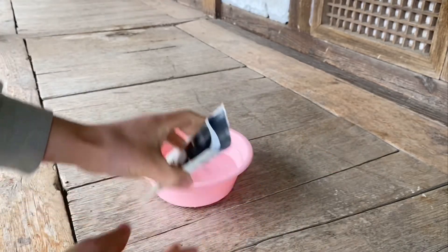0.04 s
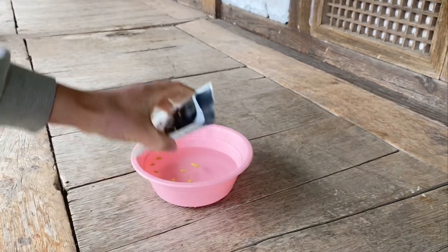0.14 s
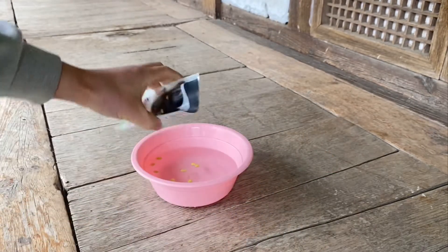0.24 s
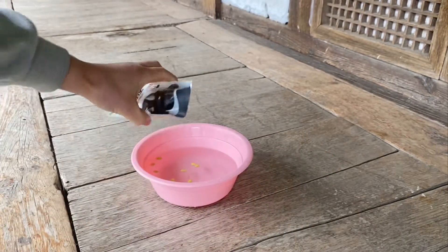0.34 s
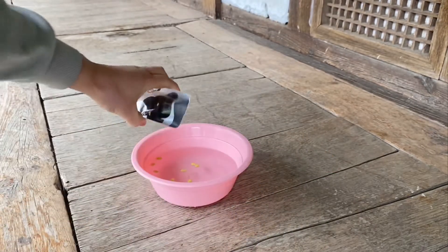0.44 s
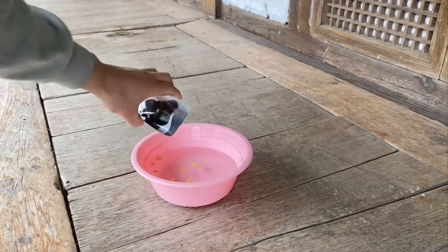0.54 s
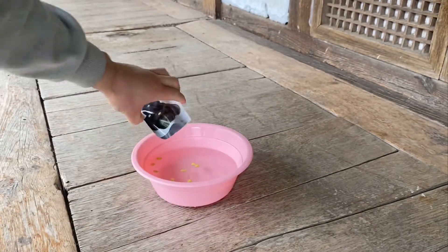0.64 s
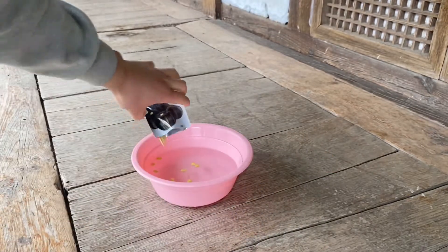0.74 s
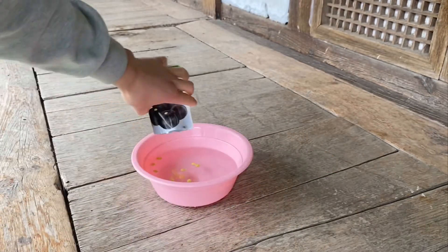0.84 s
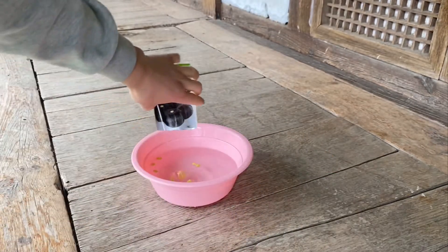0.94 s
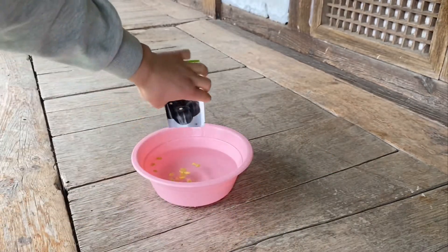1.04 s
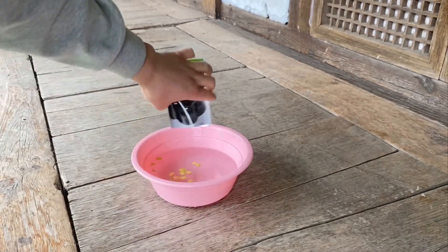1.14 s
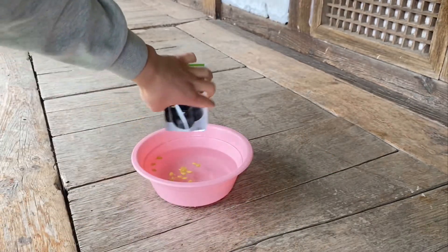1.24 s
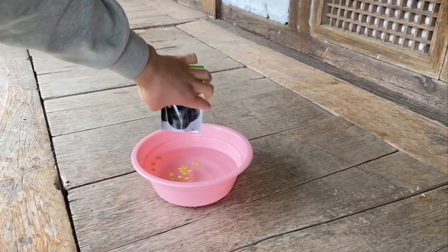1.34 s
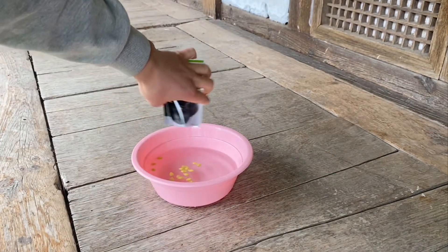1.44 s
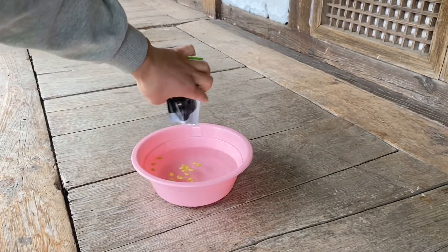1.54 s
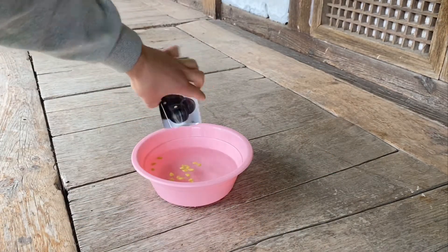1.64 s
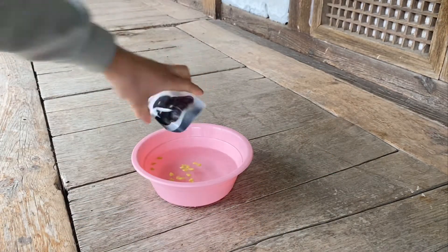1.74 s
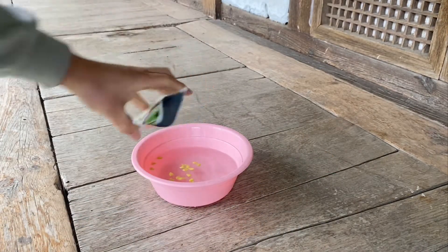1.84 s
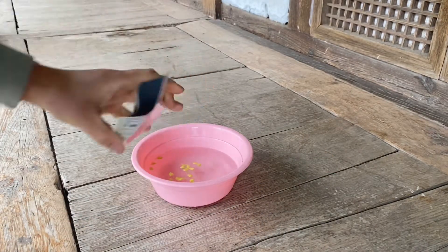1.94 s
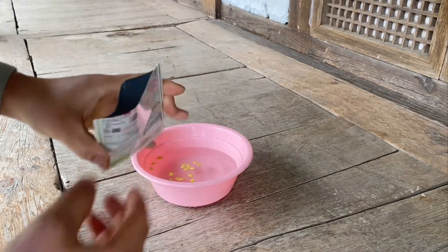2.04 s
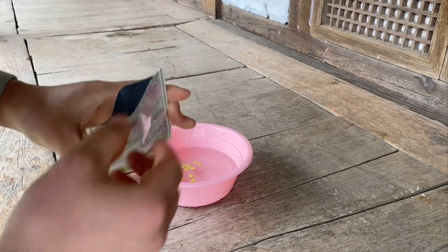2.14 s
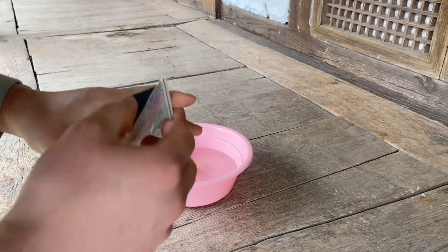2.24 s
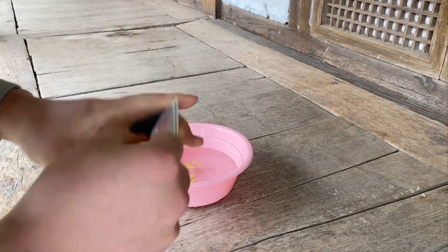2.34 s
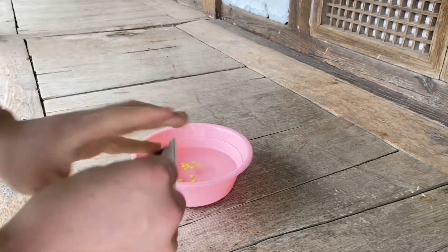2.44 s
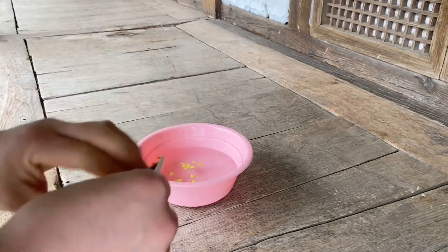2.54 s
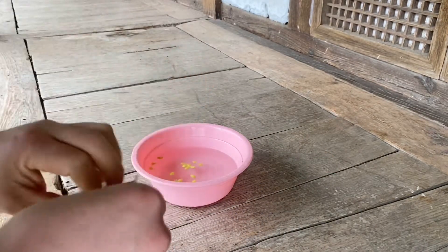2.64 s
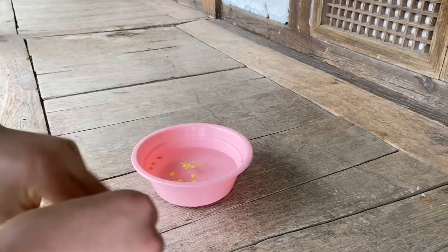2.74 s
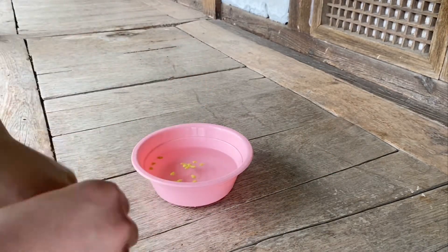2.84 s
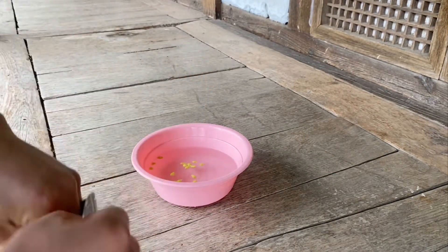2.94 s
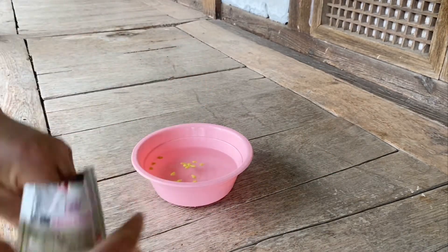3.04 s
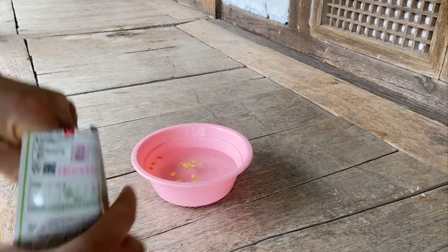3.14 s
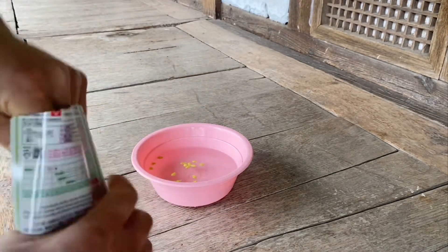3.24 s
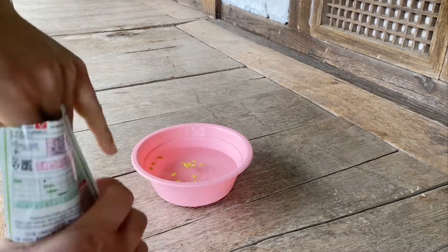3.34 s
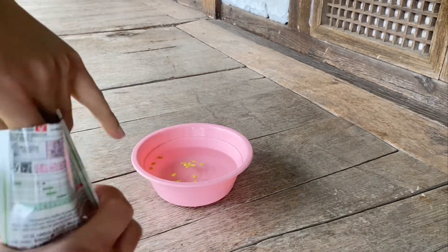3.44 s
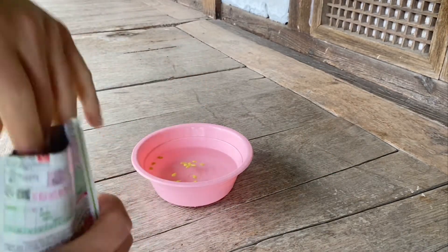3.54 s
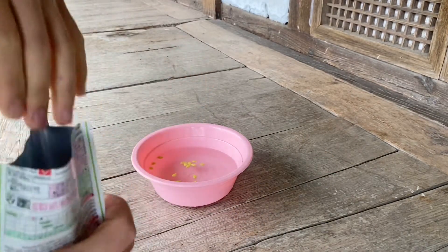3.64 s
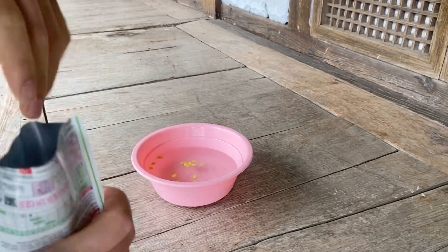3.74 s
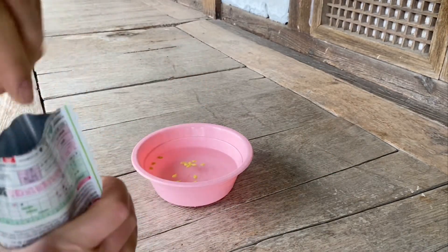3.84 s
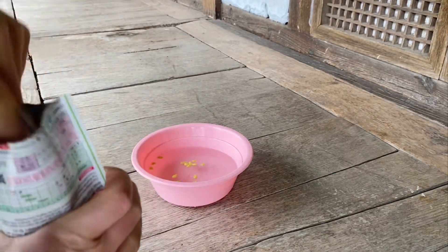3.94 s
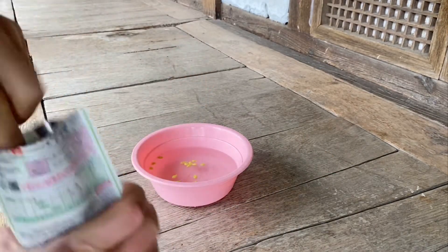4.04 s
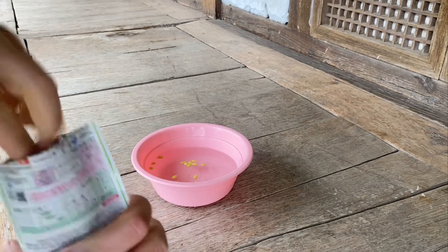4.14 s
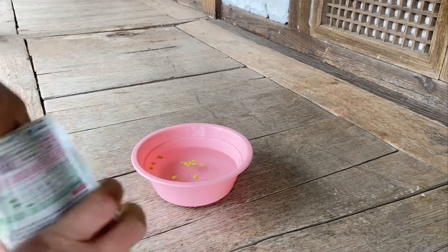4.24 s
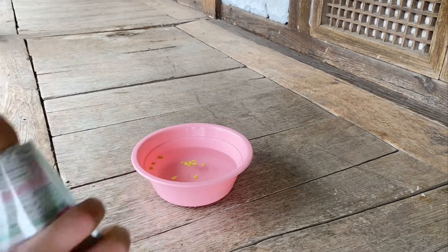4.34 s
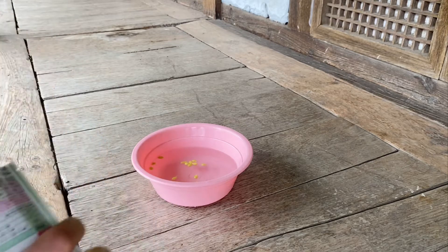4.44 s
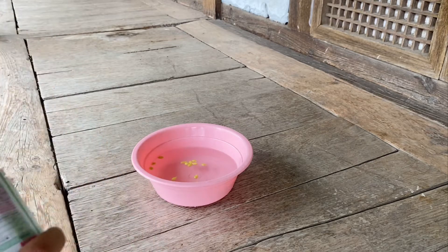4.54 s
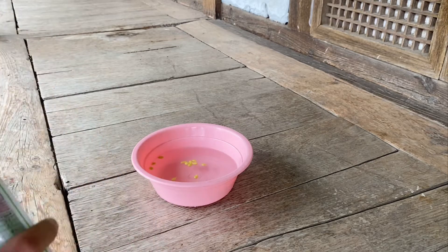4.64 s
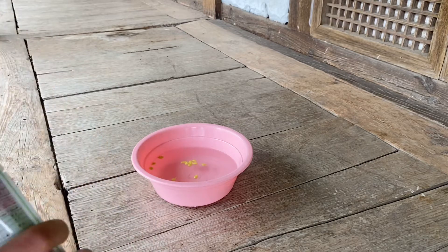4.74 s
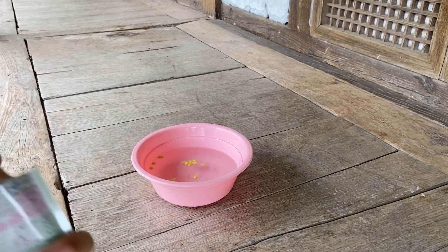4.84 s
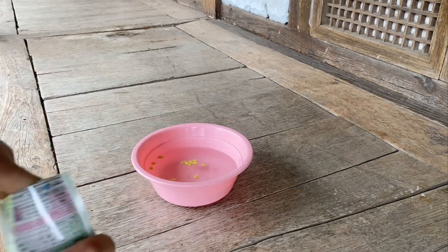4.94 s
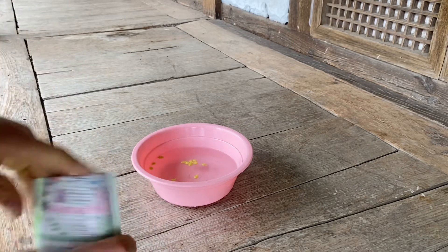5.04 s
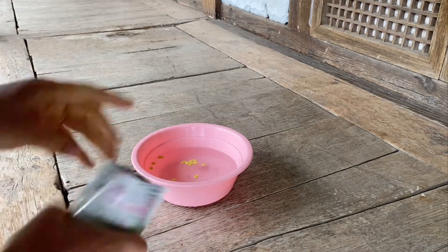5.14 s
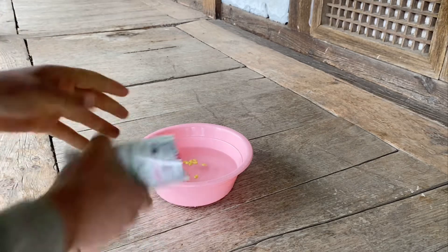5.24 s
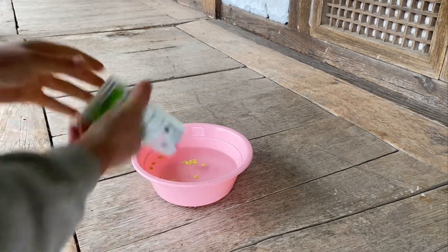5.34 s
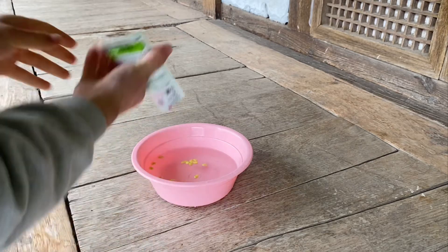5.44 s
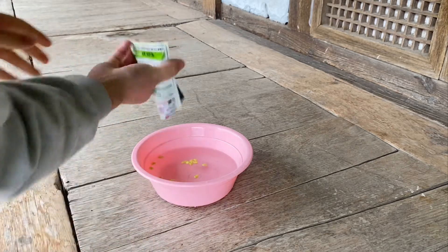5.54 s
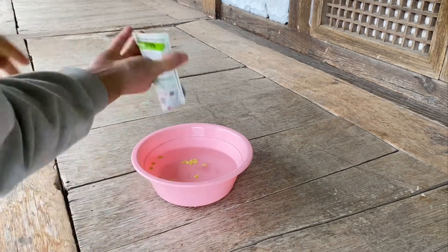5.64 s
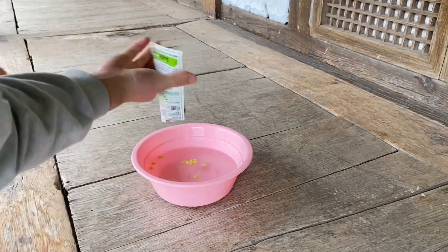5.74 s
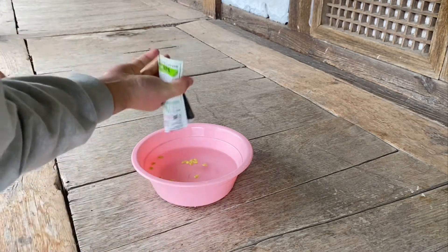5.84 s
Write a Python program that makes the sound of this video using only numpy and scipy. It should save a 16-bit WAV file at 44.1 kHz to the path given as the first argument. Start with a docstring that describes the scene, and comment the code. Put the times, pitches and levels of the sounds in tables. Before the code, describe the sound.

First very quiet: a small crumple, a whispery rush of seeds, a couple of ticks and a distant engine hum with faint bird chirps. After about two seconds a paper pouch crackles loudly nearby, left of centre, with one hard snap, uneven bursts of crumpling, finger rubbing and dull bumps, then fades to slight rustles. Outdoor porch, close stereo pickup.

```python
"""Still air on a quiet wooden porch, a faint crumple, then seeds sliding out of a stiff coated-paper packet
into a plastic basin: hissing slips sound the packet's air column. The hands then bring the packet close,
left of a two-port microphone, and pry it open: creases snap, walls crumple, knock and rub, and the air
in the pouch rings. Far off an engine hums and a bird chirps. Levels are at the source, before the packet's
placing, the porch echo and the microphone."""
import sys
import numpy as np
from scipy import signal
from scipy.fft import rfft, irfft
from scipy.io import wavfile
from scipy.ndimage import map_coordinates

SR = 44100
rng = np.random.default_rng(int(sys.argv[2]) if len(sys.argv) > 2 else 0)


def store_pcm(level_fs):
    """Save levels as 16-bit WAV."""
    pcm = np.round(np.clip(level_fs, -1, 1) * 32767).astype(np.int16)
    wavfile.write(sys.argv[1], SR, np.atleast_2d(pcm).T)


N = 259308
T = np.arange(N) / SR
LEAD = 0.005  # time for a crease to take up strain before it flips (s)


def amp(db):
    """Decibels to gain."""
    return 10 ** (np.asarray(db) / 20)


def unit(x):
    """Scales to an rms of one."""
    return x / np.sqrt(np.mean(abs(x) ** 2) + 1e-20)


def read(points, hz):
    """Reads a spectrum on a log-frequency axis."""
    f, value = np.transpose(points)
    return np.interp(np.log(hz + 1), np.log(f), value)


def level(curve):
    """A dB curve as a gain for every sample, silent outside its span."""
    return amp(np.interp(T, *np.transpose(curve), left=-np.inf, right=-np.inf))


def add(mix, s, sound):
    """Lays a sound into the mix from time s, cut off at both ends of the mix."""
    start = round(s * SR)
    sound = sound[..., max(-start, 0):]
    part = mix[..., max(start, 0):][..., :sound.shape[-1]]
    part += sound[..., :part.shape[-1]]


def bins(size=4096):
    """Frequencies of a filter's gain curve, in Hz, raised by 1 Hz to avoid zero."""
    return np.fft.rfftfreq(size, 1 / SR) + 1


def colour(x, gain):
    """Causal, minimum-phase filter with the given gain over bins(): it rings only after the blow."""
    both_sides = np.r_[gain, gain[-2:0:-1]]
    log_gain = np.log(np.maximum(both_sides, 1e-5))
    response = np.exp(np.conj(signal.hilbert(log_gain)))
    taps = np.fft.ifft(response).real
    return signal.fftconvolve(x, taps[None, :len(taps) // 2], axes=1)[:, :N]


def bell(hz, q):
    """Gain of a damped resonance."""
    return 1 / (1 + q ** 2 * (bins() / hz - hz / bins()) ** 2)


def pair(two, same):
    """Two unrelated signals become two ports that hear partly the same."""
    same = np.clip(same, 0, 1)
    return np.array([two[0], same * two[0] + np.sqrt(1 - same ** 2) * two[1]])


def wander(step):
    """A random line of unit spread that takes a new turn every step seconds."""
    return np.interp(T / step, np.arange(2000), rng.standard_normal(2000))


def shifting(sounds, step, shift_db):
    """Passes from one facet's sound to another at random, keeping the total power."""
    length = sounds[0].shape[1]
    share = amp(shift_db * np.array([wander(step)[:length] for _ in sounds]))
    share /= np.linalg.norm(share, axis=0)
    return sum(sound * weight for sound, weight in zip(sounds, share))


def gestures(rows, attack, release, crest, arch_db):
    """Gain of a series of movements: each sets in, swells to a crest, eases and dies 20 dB per release."""
    power = np.zeros(N)
    for start, length, db in rows:
        t = np.arange(0, length + 4 * release, 1 / SR)
        onset = np.minimum(t / attack, 1)
        arch = -arch_db * (np.minimum(t / length, 1) / crest - 1) ** 2
        decay = -20 * np.maximum(t - length, 0) / release
        add(power, start, (onset * amp(db + arch + decay)) ** 2)
    return np.sqrt(power)


def grains(count, per_s, spread_db, hiss):
    """Tiny slips of uneven size at random moments over a smooth hiss."""
    size = amp(spread_db * np.minimum(rng.exponential(1, count), 3.5))
    slips = size * (rng.random(count) < per_s / SR)
    strength = np.hypot(unit(slips), hiss)
    return unit(pair(rng.standard_normal((2, count)) * strength, same=0.45))


# Crackle of the packet wall. Each row: frequency in Hz, gain in dB before the tilt for brightness.
WALL_CRACKLE = [(30, -45.5), (120, -19), (500, -13), (1500, -1.5), (3000, 0), (4500, 2), (6500, -3),
                (10000, -8), (15000, -13.5)]


def packet(bright_db, ring_hz, ring_db, push_db, ring_q=2.41, overtone=1.675, overtone_db=-6,
           push_hz=320, push_q=0.41, ripple_db=2.5):
    """The wall's crackle, two air modes in the pouch and the push of the whole panel."""
    octaves = np.log2(np.maximum(bins(), 1000) / 4000)
    wall = amp(read(WALL_CRACKLE, bins()) + bright_db * octaves)
    modes = np.hypot(bell(ring_hz, ring_q), amp(overtone_db) * bell(ring_hz * overtone, ring_q))
    ring = amp(ring_db) * modes
    push = amp(push_db) * bell(push_hz, push_q)
    gain = np.sqrt(wall ** 2 + ring ** 2 + push ** 2)
    # each new shape of the wall has its own resonances
    facets = np.geomspace(200, 16000, 64)
    ripple = np.interp(bins(), facets, rng.uniform(-2, 1.5, len(facets)))
    return unit(gain * amp(ripple_db * ripple))


def panel(bright_db, ring_hz, hollow_db, push_db, push_share=0.9494):
    """Tone of a buckle: the hollower the panel, the more it rings the pouch and pushes the air."""
    return packet(bright_db, ring_hz, hollow_db, push_db + push_share * hollow_db)


def snap(length, jolt=0.098, even=0.18, onset=0.15, strain=0.41):
    """A crease strains, flips over and leaves the panel fluttering; carries one millisecond of unit power."""
    t = T[:1024] - LEAD
    since = t - onset * length
    swell = amp(20 * np.minimum(since / (strain * length), -since / length))
    shiver = pair(rng.standard_normal((2, len(t))), same=0.706) * swell
    shiver /= np.linalg.norm(shiver, axis=1, keepdims=True)
    shiver[:, swell.argmax()] += jolt
    # a broad panel has no deep gaps in its spectrum
    z = rfft(shiver, 2 * len(t))
    flip = irfft(z / abs(z) ** np.clip(even, 0, 1))[:, :len(t)]
    return flip * np.sqrt(2 * SR / 1000 / np.sum(flip ** 2))


# Spectrum of the outdoor quiet. Each row: frequency in Hz, relative level in dB.
OUTDOOR_AIR = [(20, -30.5), (72, 7.5), (110, -7.5), (320, -9.5), (600, -21), (1100, -20), (1240, -16.5),
               (1400, -21), (3000, -30), (15000, -43)]
# Hum of an engine far beyond the porch. Each row: time in seconds, level in dB.
ENGINE_HUM = [(1.1, -81), (1.35, -59.5), (2.8, -66.5), (3.5, -84)]


def outdoors(air_db=-70.0, hum_hz=45, octave_db=-7, waver=0.099, uneven_db=2.0, step=0.036):
    """Still air, its bass alike at both ports, and the uneven, wavering hum of a far engine."""
    hz = np.fft.rfftfreq(N, 1 / SR)
    noise = rfft(rng.standard_normal((2, N)))
    air = irfft(pair(noise, same=1 / (1 + (hz / 700) ** 2)) * amp(read(OUTDOOR_AIR, hz)), N)
    turn = 2 * np.pi * np.cumsum(hum_hz * (1 + waver * wander(step))) / SR
    hum = np.sin(turn) * amp(uneven_db * wander(step))
    hum += np.sin(2 * turn) * amp(octave_db + uneven_db * wander(step))
    return amp(air_db) * unit(air) + level(ENGINE_HUM) * unit(hum)


# Chirps of a bird far from the porch. Each row: start in seconds, top pitch in Hz.
BIRD_CHIRPS = [(1.189, 10030), (1.19, 7900), (1.29, 7160), (1.64, 7470)]


def bird(db=-86, length=0.061, arch=0.23, crest=0.34):
    """Thin, faint chirps whose pitch rises a little and falls away."""
    out = np.zeros((2, N))
    part = np.arange(0, length, 1 / SR) / length
    for s, hz in BIRD_CHIRPS:
        pitch = hz * (1 - arch * (part - crest) ** 2)
        turn = 2 * np.pi * np.cumsum(pitch) / SR
        add(out, s, amp(db) * np.sin(np.pi * part) * np.sin(turn))
    return out


# Soft bumps of the hands. Each row: start in seconds, peak of the envelope in dB.
HAND_BUMPS = [(2.692, -36.5), (2.845, -43), (3.11, -45.5), (4.986, -44), (5.042, -43)]


def bumps(hz=85, width=0.0037):
    """A soft blow gives little more than one slow push and pull of the air."""
    out = np.zeros((2, N))
    t = T[:SR // 10]
    swell = t / width * np.exp(1 - t / width)
    for s, db in HAND_BUMPS:
        add(out, s, amp(db) * swell * np.sin(2 * np.pi * hz * t))
    return out


# Air column of the open packet. Each row: resonance in Hz, width in Hz, relative level in dB.
AIR_COLUMN = [(1524, 129, 7), (1961, 57, 4), (2766, 134, 0)]
# Tips of the packet that set the seeds sliding. Each row: start in seconds, length in seconds, level in dB.
SEED_TIPS = [(.34, 0.3465, -53), (.74, 0.1047, -70), (1.1, 0.0416, -69), (1.405, 0.024, -72),
             (1.55, 0.0206, -66.5)]
# One slide, in order: attack in seconds, release in seconds, share of its length at which it runs fastest,
# dB weaker at its start.
SLIDE = (.006, .055, .72, 14)
# Single seeds ticking. Each row: time in seconds, level in dB over a millisecond.
SEED_TICKS = [(.745, -44), (0.765, -40.5), (1.77, -54), (1.783, -55.5), (2.073, -56)]


def seeds():
    """Seeds skid along the packet, sounding its air column, and a few tick as they drop."""
    modes = [amp(db) ** 2 * bell(hz, hz / width / 2) ** 2 for hz, width, db in AIR_COLUMN]
    column = np.sqrt(sum(modes))
    wall = amp(-11.0) * packet(bright_db=1.0, ring_hz=1393, ring_db=9.5, push_db=0.5)
    skid = colour(grains(N, per_s=1500, spread_db=0.5, hiss=1.0), unit(np.hypot(column, wall)))
    # the resonances climb as the seeds run out, then ease back: a varying reading speed
    emptying = np.interp(T, [0.4, 0.75, 1], [0.96, 1.12, 1])
    at = np.cumsum(emptying)
    skid = np.array([map_coordinates(port, [at], order=3) for port in skid])
    out = gestures(SEED_TIPS, *SLIDE) * skid
    for s, db in SEED_TICKS:
        tone = packet(bright_db=-0.5, ring_hz=2800, ring_db=-2.5, push_db=-8.5)
        add(out, s - LEAD, amp(db) * colour(snap(length=0.013), tone))
    return out


# Finger strokes over the packet. Each row: start in seconds, length in seconds, level of the gesture in dB.
FINGER_STROKES = [(.297, 0.103, -63.5), (2.2, 1, -58.5), (2.6, 0.167, -47.5), (2.88, 0.0305, -45.5),
                  (2.98, 0.61, -55), (3.39, 0.1246, -46.5), (3.53, 0.0801, -52.5), (3.94, 0.0651, -51.5),
                  (4.07, 0.0594, -40.5), (4.16, 0.2351, -53.5), (4.447, 0.0285, -48.5),
                  (4.45, 0.686, -62.5), (4.885, 0.162, -48), (5.1, 0.682, -76), (5.388, 0.033, -58)]
# One stroke, in order: attack in seconds, release in seconds, share of its length at which it presses
# hardest, dB weaker at its start.
STROKE = (0.005, 0.031, 0.498, 4)


def rub(count=5, low_hz=900, high_hz=1900):
    """Fingers drag over one facet of the wall after another, each with its own ring; their pads pat it softly."""
    facets = []
    for ring_hz in np.geomspace(low_hz, high_hz, count):
        tone = packet(bright_db=3.0, ring_hz=ring_hz, ring_db=11.5, push_db=7.0, ripple_db=5.0)
        facets.append(colour(grains(N, per_s=300, spread_db=1.1, hiss=0.7), tone))
    drag = unit(shifting(facets, step=0.025, shift_db=5.0))
    pats = colour(grains(N, per_s=150, spread_db=-0.5, hiss=0.41), unit(bell(hz=332.5, q=4.2)))
    return gestures(FINGER_STROKES, *STROKE) * (amp(-1.5) * drag + amp(-15.5) * pats)


# Whole walls of the packet flexing over with a hollow knock. Each row: start in seconds, peak in dB before
# the stutter, pitch in Hz it settles at before the waver, seconds to its peak.
WALL_FLEXES = [(1.606, -51, 207.1, 0.007), (2.198, -50, 313, 0.0029), (3.151, -38.5, 328, 0.00296),
               (3.599, -55, 331.4, 0.00964), (4.664, -43, 360, 0.00138), (4.684, -37, 994, 0.0019),
               (4.785, -45, 465, 0.001524), (4.799, -38.5, 701.5, 0.00295), (5.022, -40.5, 380.3, 0.00325),
               (5.4266, -31.5, 1104, 0.001081)]


def flexes(slacken=0.35, waver_share=0.11, stutter_share=1):
    """Each knock is a few cycles of one low mode, falling in pitch as the wall slackens."""
    out = np.zeros((2, N))
    for s, db, hz, rise in WALL_FLEXES:
        age = np.arange(0, 10 * rise, 1 / SR) / rise
        lines = rng.standard_normal((2, 20))
        waver, stutter = (np.interp(2 * age, np.arange(20), line) for line in lines)
        pitch = hz * (1 + slacken * np.exp(-age / 2) + waver_share * waver)
        swell = (1 + stutter_share * stutter) * age * np.exp(1 - age)
        add(out, s, amp(db) * swell * np.sin(2 * np.pi * np.cumsum(pitch) / SR))
    return out


# Crumples of the wall. Each row: time of the height in seconds, level in dB, rise in seconds,
# brightness in dB per octave, pouch ring in Hz, hollowness in dB.
WALL_CRUMPLES = [(0.012, -56.5, 0.0035, 5.5, 1812, 19.5), (1.636, -58, 0.0582, 1.5, 1478, 15.5),
                 (2.249, -45.5, 0.02, -8.5, 1530, 7.5), (2.356, -44, 0.03054, 4.5, 1141, 15),
                 (2.663, -33, 0.0065, 2.5, 919, 23.5), (2.676, -31, 0.00967, -1.5, 1030, 15),
                 (2.713, -31.5, 0.005, -4.5, 2904, 9), (2.733, -33.5, 0.0055, 2, 4100, -6),
                 (3.134, -40, 0.00653, -0.5, 647, 20.5), (3.508, -43.5, 0.0086, 3.5, 1806, 13),
                 (3.604, -51, 0.01985, -2.5, 340, 18), (3.836, -35, 0.0071, -1.5, 1022, 14),
                 (3.949, -42, .036, 2, 381, 7.5), (4.125, -23, 0.0171, 1, 1430, 7),
                 (4.952, -26.5, 0.01286, 3.5, 960, 47), (5.02, -33.5, 0.01114, 4.5, 1010, 16.5),
                 (5.045, -40, 0.027, 1.5, 990, 14), (5.443, -47, 0.014, 2, 1409, 10),
                 (5.805, -60, 0.0282, -3, 740, 31.5)]


def crumples(count=4, middling_s=0.032, middling_db=-40, spent=0.3):
    """Swarms of tiny buckles swell and die, passing from facet to facet; rise and fall each span 20 dB."""
    out = np.zeros((2, N))
    for s, db, rise, *tone in WALL_CRUMPLES:
        # a harder squeeze is spent sooner (spent: dB per dB)
        fall = middling_s * amp(-spent * (db - middling_db))
        t = np.arange(-rise, 2 * fall, 1 / SR)
        swell = amp(20 * np.minimum(t / rise, -t / fall))
        swell_rms = np.sqrt(np.mean(swell ** 2))
        facets = []
        for _ in range(count):
            swarm = unit(grains(len(t), per_s=900, spread_db=2.5, hiss=0.16) * swell) * swell_rms
            facets.append(colour(swarm, panel(*tone, push_db=-10.5)))
        add(out, s - rise, amp(db) * shifting(facets, step=0.012, shift_db=7.0))
    return out


# Creases that buckle. Each row: time in seconds, level in dB over a millisecond, length in seconds,
# brightness in dB per octave, pouch ring in Hz, hollowness in dB.
CREASE_SNAPS = [(1.615, -37.5, 0.0069, 7.5, 1572, 26), (1.756, -43, 0.00543, 2.5, 864, 20.5),
                (2.2312, -26.5, 0.0086, -7.5, 2020, 17), (2.443, -30.5, 0.0032, -3.5, 1014, -6),
                (2.521, -18.5, 0.00398, -1.5, 1850, 4), (2.594, -24, 0.00366, -3, 3100, -1),
                (2.8415, -23.5, 0.00532, -5, 1640, 0), (2.9009, -25, 0.00684, 4, 1134, 10),
                (2.9821, -30.5, 0.0064, 1, 2500, 9), (3.099, -30.5, 0.00363, -4, 964, 19),
                (3.1758, -10.5, 0.002047, -0.5, 4365, 2.5), (3.2517, -31, 0.00214, -6.5, 3350, 1.5),
                (3.386, -27.5, 0.00558, -3.5, 1190, 13), (3.851, -29, 0.00753, 5.5, 1632, 16),
                (4.1052, -25, 0.0048, -2.5, 1660, -6), (4.4708, -29, 0.0067, 0, 3530, -9.5),
                (4.5291, -21.5, 0.00212, -4.5, 2010, -1.5), (4.682, -26.5, 0.00377, 4, 1076, 6),
                (4.74, -25, 0.00735, 1, 1595, 15), (4.797, -28, 0.0061, 0.5, 988, 29.5),
                (4.961, -20, 0.00604, -9, 1170, -3.5), (4.9776, -26, 0.0054, 2.5, 837, 9),
                (5.427, -33, 0.0051, -6.5, 1600, 27), (5.5565, -42, 0.00514, -4, 1439, 23.5)]
# Small creases that tick with one common tone. Each row: time in seconds, level in dB over a millisecond.
CREASE_TICKS = [(2.503, -35), (2.806, -36.5), (2.826, -35), (2.865, -30.5), (3.168, -32), (3.456, -36.5),
                (4.115, -30), (4.954, -26.5), (5.672, -57.5), (5.71, -56), (5.773, -58)]


def snaps(push_db=-2):
    """Creases popping in and out, large and small."""
    out = np.zeros((2, N))
    for s, db, length, *tone in CREASE_SNAPS:
        add(out, s - LEAD, amp(db) * colour(snap(length), panel(*tone, push_db)))
    for s, db in CREASE_TICKS:
        tone = panel(bright_db=-4.0, ring_hz=900, hollow_db=11.0, push_db=push_db)
        add(out, s - LEAD, amp(db) * colour(snap(length=0.0065), tone))
    return out


def bend(x, lag=0.00508, knee_hz=400):
    """Slow bending waves in the wall: the bass arrives after the treble, so every click chirps downward."""
    hz = np.fft.rfftfreq(2 * N, 1 / SR)
    delay = lag / (1 + (hz / knee_hz) ** 1.5)
    phase = 2 * np.pi * np.cumsum(delay) * hz[1]
    return irfft(rfft(x, 2 * N) * np.exp(-1j * phase))[:, :N]


# Where the packet is. Each row: time in seconds, lead of the left port in ms, left minus right in dB.
PACKET_PLACE = [(2, 0.143, 1), (3.5, 0.2703, 2), (4.701, 0.3293, 3), (5.502, 0.1223, 0)]


def place(x):
    """The packet is on the left: the right port hears it later and, where the levels differ, weaker."""
    s, lead_ms, side_db = np.transpose(PACKET_PLACE)
    late = np.arange(N) - np.interp(T, s, lead_ms) * SR / 1000
    side = amp(np.interp(T, s, side_db))
    right = map_coordinates(x[1], [late], order=3)
    return np.array([side * x[0], right]) * np.sqrt(2 / (1 + side ** 2))


# Porch echo. Each row: frequency in Hz, time to die by 60 dB in seconds.
PORCH_DECAY = [(200, 0.223), (5000, 0.152), (14000, 0.19)]


def porch(x, scatter_db=-13, tail_db=-11, build=0.011):
    """Quick scatter off the hands, then a short tail under the eaves."""
    t = T[:SR // 2]
    taps = rng.choice([-1., 1.], (2, len(t))) * (rng.random((2, len(t))) < 0.1)
    near = taps * (t > 0.002) * np.exp(-t / 0.0048)
    building = taps * (1 - np.exp(-(t / build) ** 2))
    hz, at, z = signal.stft(building, SR, nperseg=256)
    decay = amp(-60 * at / read(PORCH_DECAY, hz)[:, None])
    tail = signal.istft(z * decay, SR, nperseg=256)[1][:, :len(t)]
    echo = (amp(scatter_db) * unit(near) + amp(tail_db) * unit(tail)) / np.sqrt(len(t))
    return x + signal.fftconvolve(x, echo, axes=1)[:, :N]


def scene():
    """The packet on the porch, with the outdoors behind it."""
    buckling = bend(snaps() + crumples())
    handled = place(buckling + flexes() + rub() + seeds())
    return porch(handled + bumps() + bird()) + outdoors()


# Microphone colour common to both ports. Each row: frequency in Hz, gain in dB.
MIC_COLOUR = [(5500, 2), (7000, -1), (10000, 2.5), (12200, -2.5), (15500, -2.5)]
# The left port has less bass and more midrange than the right. Each row: frequency in Hz, left minus right in dB.
PORT_DIFFERENCE = [(100, -3), (600, 1.5), (5500, 2)]


def record(dry, split_hz=6750, turn_hz=3650, edge_hz=15800):
    """The colour of each port, treble shared from the left port with a turning phase, then the band limit."""
    shared, apart = read(MIC_COLOUR, bins()), read(PORT_DIFFERENCE, bins()) / 2
    left = colour(dry[:1], amp(shared + apart))
    right = colour(dry[1:], amp(shared - apart))
    left, right = rfft(np.vstack([left, right]), 2 * N)
    # above split_hz the left port feeds both channels, their phase parting by a full turn every turn_hz
    hz = bins(2 * N)
    treble = 1 / (1 + (split_hz / hz) ** 20)
    turned = left * np.exp(2j * np.pi * (hz - split_hz) / turn_hz)
    right = np.sqrt(1 - treble) * right + np.sqrt(treble) * turned
    heard = irfft(np.array([left, right]))[:, :N]
    band = signal.firwin(511, edge_hz, window=("kaiser", 9), fs=SR)
    return signal.oaconvolve(heard, band[None], "same")


dry = scene()
out = record(dry)
store_pcm(out)
```